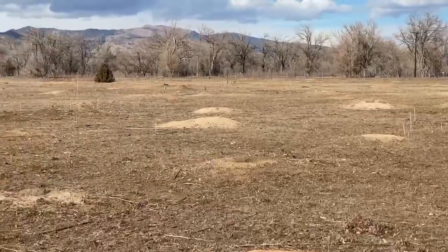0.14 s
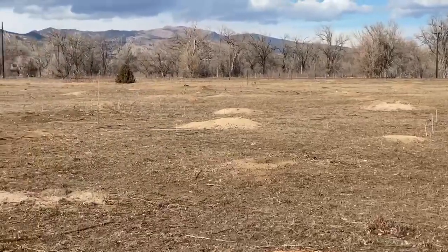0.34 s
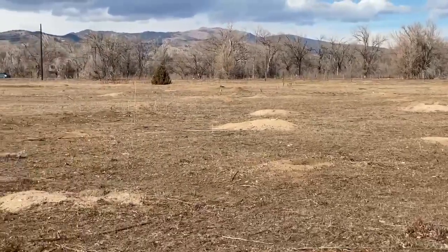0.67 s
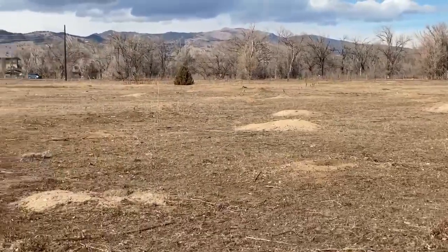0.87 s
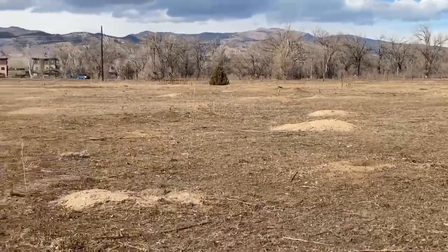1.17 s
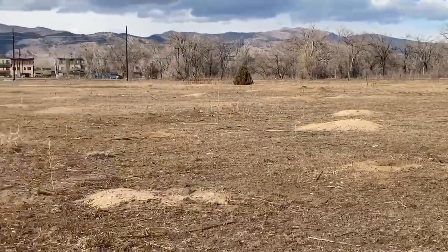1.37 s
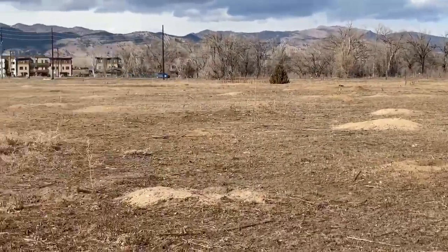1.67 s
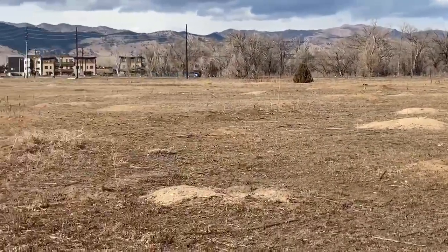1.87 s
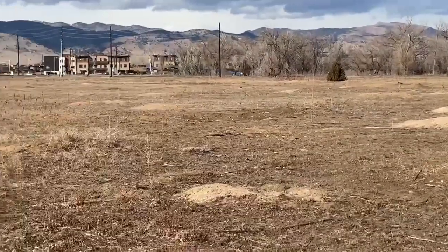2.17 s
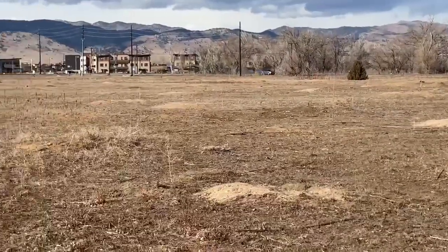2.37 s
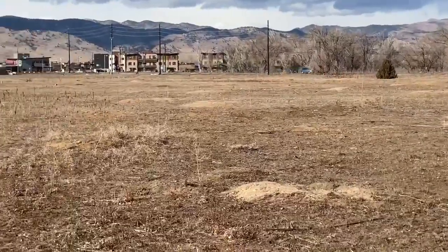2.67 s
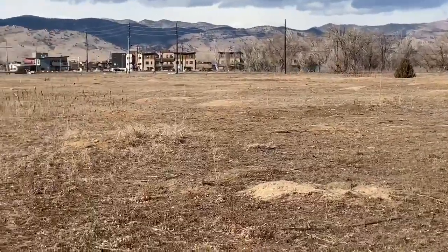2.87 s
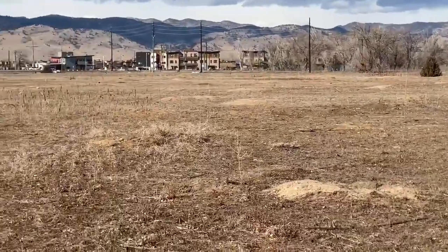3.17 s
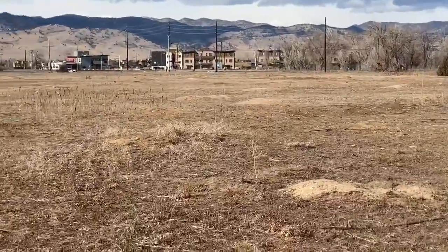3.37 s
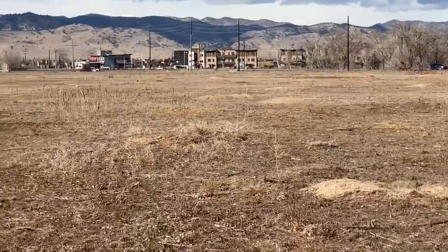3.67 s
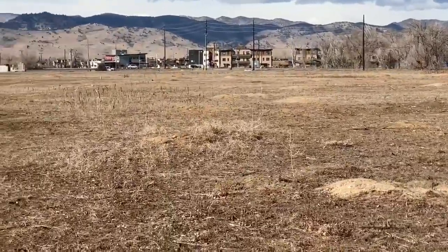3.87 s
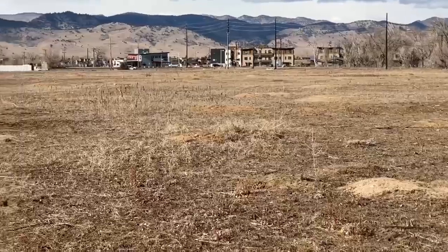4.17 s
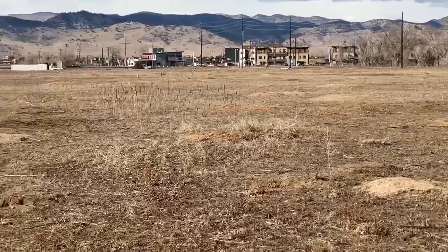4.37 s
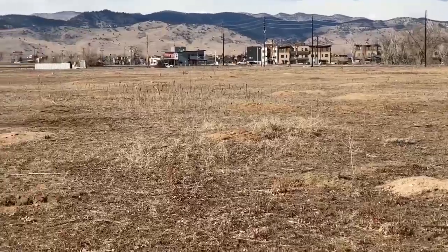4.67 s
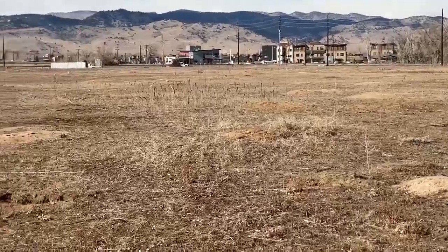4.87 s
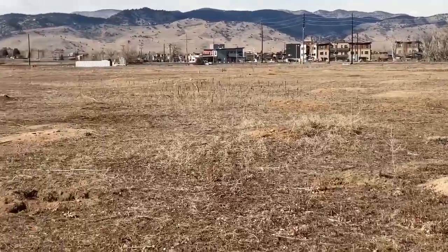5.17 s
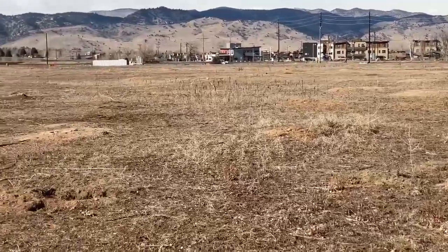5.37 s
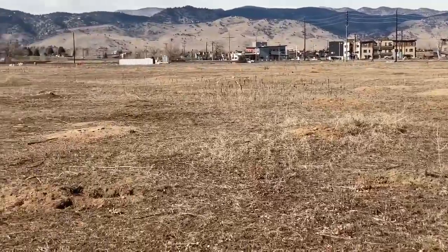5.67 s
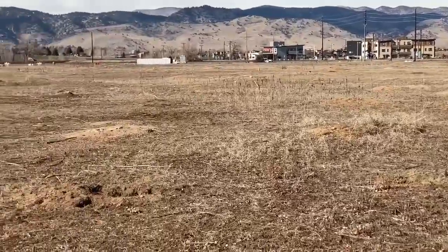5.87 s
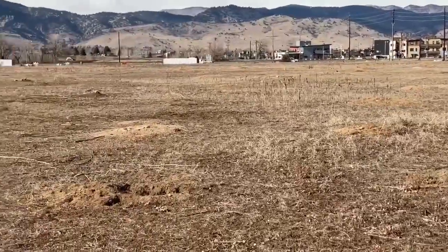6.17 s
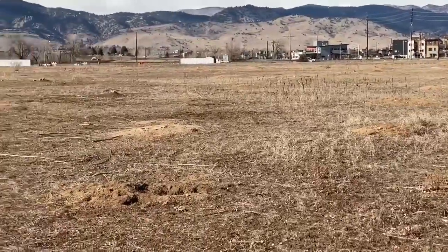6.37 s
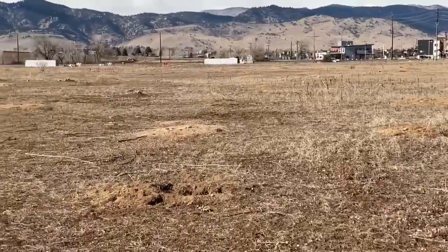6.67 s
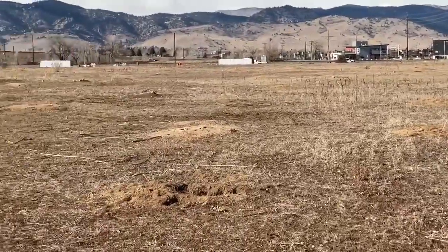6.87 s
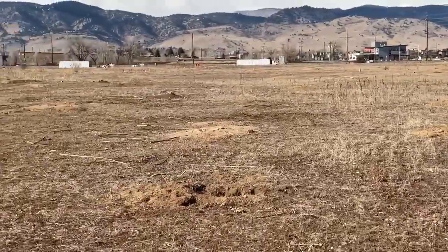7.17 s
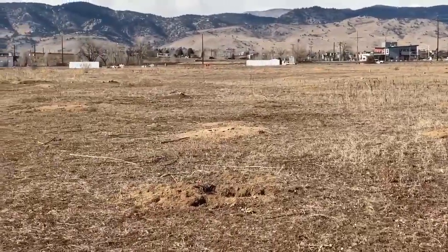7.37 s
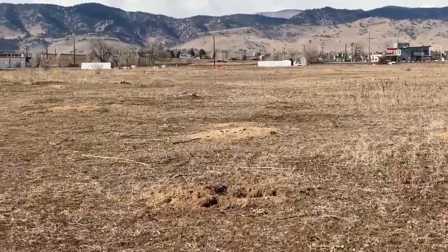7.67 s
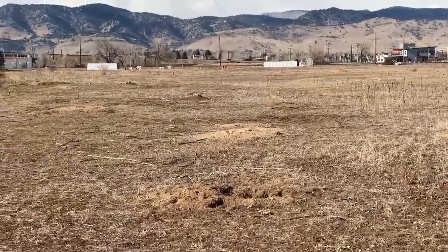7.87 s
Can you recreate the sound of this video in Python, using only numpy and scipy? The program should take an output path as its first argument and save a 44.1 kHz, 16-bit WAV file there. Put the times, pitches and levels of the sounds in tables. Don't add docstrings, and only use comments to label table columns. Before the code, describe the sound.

A single prairie dog barks a dozen times across an open dry field, each a tiny chirp cracking into a buzzy yelp, with faint echoes. Far road roar, low rumble and a wavering engine hum lie beneath. At about two and a half seconds wind thumps the microphone, then the bass thins out, leaving small muffled ticks and light hiss.

```python
import sys
import numpy as np
from scipy import signal
from scipy.fft import rfft, irfft, next_fast_len
from scipy.io import wavfile

SR = 44100
rng = np.random.default_rng(int(sys.argv[2]) if len(sys.argv) > 2 else 0)


def wav_record(signal):
    frames = np.transpose(np.atleast_2d(signal))
    bounded = np.clip(frames, -1, 1)
    quanta = np.round(bounded * 32767).astype(np.int16)
    wavfile.write(sys.argv[1], SR, quanta)


def amplitude_ratio(level_db):
    exponent = np.asarray(level_db, float) / 20
    return 10 ** exponent


N = 354123

# (time [s], echo level [dB], level of the top overtones [dB])
TURN = [
    (0.4, 5.5, -3),
    (1.7, -0.5, -4),
    (4.5, -2, 6.5),
    (7.6, -3, 3.5),
]
# (frequency [Hz], level [dB])
YELP_MOUTH = [(1000, -24.5), (1500, -11.5), (1800, -1.5), (2500, -4.5), (3200, 1), (4200, -13.5),
              (5000, -12.5), (6300, -6), (7300, -24.5), (7900, -32), (8600, -49), (9700, -28), (11000, -54),
              (12500, -60)]
LAP_S = 0.003


def rms_one(x):
    return x / np.sqrt(np.mean(np.abs(x) ** 2) + 1e-20)


def at_s(rows, s):
    times, *columns = np.transpose(rows)
    return [np.interp(s, times, c) for c in columns]


def in_time(rows):
    return at_s(rows, np.arange(N) / SR)


def at_hz(points, hz):
    point_hz, level = np.array(points).T
    return np.interp(np.log(hz), np.log(point_hz), level)


def arch(u, start, middle, end):
    return start * (1 - u) * (1 - 2 * u) + 4 * middle * u * (1 - u) + end * u * (2 * u - 1)


def edges_of(n, rise_s, fall_s):
    t = np.arange(n) / SR
    return np.sin(np.pi / 2 * np.clip(t / rise_s, 0, 1) * np.clip(t[::-1] / fall_s, 0, 1)) ** 2


def add(track, note, s):
    i = round(s * SR)
    track[i:i + len(note)] += note


def drift(rate_hz, size=N):
    step = max(1, int(SR / rate_hz / 40))
    r = np.exp(-2 * np.pi * rate_hz * step / SR)
    noise = rng.standard_normal(size // step + 102)
    slow = signal.lfilter([1], [1, -2 * r, r * r], noise)[100:]
    return np.interp(np.arange(size) / step, np.arange(len(slow)), rms_one(slow))


def banded_noise(spectrum, patchy_db, flicker_hz, apart):
    # (frequency [Hz], likeness [0-1])
    likeness = [(60, 0.9), (120, 0.72), (230, 0.56), (450, 0.37), (880, 0.15), (1730, 0.28), (3390, 0.17),
                (4700, 0.9)]
    out, together = 0, drift(flicker_hz)
    edges = 20 * 2 ** np.arange(0, 9.6, 0.5)
    size = next_fast_len(N)
    colour = amplitude_ratio(at_hz(spectrum, np.fft.rfftfreq(size, 1 / SR) + 1))
    noise = irfft(rfft(rng.standard_normal((2, 2, size))) * colour, size)[..., :N]
    for k, (low, high) in enumerate(zip(edges, edges[1:])):
        hz = np.sqrt(low * high)
        if not spectrum[0][0] * 0.7 < hz < spectrum[-1][0] * 1.2:
            continue
        band = signal.butter(2, [low, high], "band", fs=SR, output="sos")
        mid, side = signal.sosfilt(band, noise[k % 2])
        alike = np.clip(at_hz(likeness, hz) - apart, -1, 1)
        swing = np.minimum(together + 0.6 * drift(flicker_hz), 1.5)
        stereo = np.sqrt(1 + alike) * mid + np.sqrt(1 - alike) * side * [[1], [-1]]
        out = out + amplitude_ratio(patchy_db * swing) * stereo
    return rms_one(out)


def self_noise():
    # (frequency [Hz], level [dB per Hz])
    hiss_colour = [(1500, -0.5), (3000, -2), (5000, -5.5), (7200, -6.5), (8000, -12.5), (8350, -8),
                   (8650, -19.5), (9000, -10.5), (10300, -5), (11500, -15), (13000, -28)]
    return amplitude_ratio(-89) * banded_noise(hiss_colour, patchy_db=0.7, flicker_hz=9, apart=-0.059)


def road():
    # (time [s], level [dB], left-right difference [dB])
    traffic = [
        (0.0, -58.5, -2),
        (0.96, -61.5, -1.5),
        (1.9, -60.5, -2.5),
        (3.7, -60.5, 2),
        (5.0, -63, 0.5),
        (5.46, -61.5, 1),
        (7.3, -65, -1),
        (8.03, -65, 0.5),
    ]
    # (frequency [Hz], level [dB per Hz])
    road_colour = [(150, -31.5), (250, -5), (333, -3), (395, -7.5), (581, -6), (860, 0), (1070, -5),
                   (1650, -8), (1850, -12), (2150, -22.5), (2820, -39.5), (3200, -47.5), (4160, -75)]
    road_db, pan_db = in_time(traffic)
    sides = amplitude_ratio(np.array([pan_db, -pan_db]) / 2)
    roar = banded_noise(road_colour, patchy_db=1, flicker_hz=7.5, apart=-0.0038)
    return amplitude_ratio(road_db + 2) * sides * roar


def rumble():
    # (frequency [Hz], level [dB per Hz])
    rumble_colour = [(25, -40.5), (35, -21), (50, -8), (65, 3.5), (100, -3), (140, -10.5), (190, -16.5),
                     (300, -34.5), (500, -34.5)]
    return amplitude_ratio(-47) * banded_noise(rumble_colour, patchy_db=1, flicker_hz=5.3, apart=-0.14)


def engine():
    # (multiple of the base pitch, level [dB])
    hums = [
        (1, -58),
        (2, -46),
        (3, -49.5),
        (4, -58.5),
        (5, -74),
        (6, -71.5),
    ]
    phase = 2 * np.pi * np.cumsum(40.85 * (1 + 0.006 * drift(1.5))) / SR
    out = 0
    for k, db in hums:
        out = out + amplitude_ratio(db + 1 + 3.6 / k * drift(5)) * np.sin(k * phase + 7 * rng.random())
    behind = amplitude_ratio(np.interp(np.arange(N) / SR, [3.2, 4.2], [0, -8]))
    return behind * edges_of(N, 0.0025, 0.001) * out


def far_calls():
    # (time [s], length [s], start [Hz], middle [Hz], end [Hz], level [dB])
    calls = [
        (3.033, 0.016, 7500, 7500, 7440, -85.5),
        (4.714, 0.044, 3250, 3270, 3340, -86),
        (6.092, 0.049, 2980, 2900, 2940, -83),
        (6.134, .015, 4100, 4000, 4000, -88),
        (7.521, 0.069, 3410, 2860, 3500, -88),
    ]
    out = np.zeros(N)
    for s, length, start, middle, end, db in calls:
        u = np.linspace(0, 1, round(length * SR))
        tone = np.sin(2 * np.pi * np.cumsum(arch(u, start, middle, end)) / SR)
        level = amplitude_ratio(db + 3 + 3.2 * drift(200, len(u)))
        add(out, level * edges_of(len(u), 0.0091, 0.0091) * tone, s)
    return out


def wind():
    # (time [s], level [dB])
    gusts = [(2.55, -53.5), (2.85, -51), (3.1, -54.5), (3.45, -65), (3.77, -59.5), (4.15, -69), (4.3, -82),
             (4.61, -73), (5.25, -76.5), (5.5, -65.5), (5.68, -68), (6.15, -72), (6.42, -54), (6.53, -93),
             (6.7, -85), (6.8, -74), (7.12, -66.5), (7.42, -68), (8.03, -64)]
    # (frequency [Hz], level [dB per Hz])
    wind_colour = [(25, -28.5), (40, 0.5), (60, 10), (120, 4.5), (250, -14.5), (400, -34), (700, -43)]
    gusting = np.clip((np.arange(N) / SR - 2.5) / 0.056, 0, 1)
    buffets = banded_noise(wind_colour, patchy_db=6, flicker_hz=18, apart=0.04)
    return gusting * amplitude_ratio(in_time(gusts)[0] + 11.5) * buffets


def pops(count=24):
    # (time [s], peak level [dB])
    strong = [(2.58, -31.5), (2.712, -41), (2.785, -37), (2.894, -27), (3.079, -35.5), (3.448, -35.5),
              (3.518, -41), (3.562, -40.5), (3.598, -44.5), (3.703, -42), (3.807, -44.5), (3.98, -43.5),
              (4.069, -41), (4.094, -47.5), (4.156, -46.5), (4.446, -43.5), (4.507, -49), (4.631, -48),
              (4.847, -52), (5.289, -50), (5.371, -46.5), (5.428, -49), (5.919, -49.5), (6.034, -49.5),
              (6.495, -47), (7.021, -50.5), (7.257, -48), (7.298, -44.5), (7.486, -49.5), (7.862, -39)]
    # (time [s], pitch [Hz])
    pop_pitch = [(3.45, 123), (3.6, 215), (3.98, 226), (4.08, 387), (4.85, 247), (5.35, 330), (6.5, 272),
                 (7.3, 180), (7.9, 136.5)]
    out = np.zeros(N + SR)
    small_s = 3 + 4.9 * rng.random(count)
    small_db = -56 + 10.5 * rng.uniform(-1, 1, count)
    for s, db in [*strong, *zip(small_s, small_db)]:
        hz = at_s(pop_pitch, s)[0] * rng.uniform(0.88, 1.12)
        t = np.arange(round(4 / hz * SR)) / SR
        thump = np.sin(2 * np.pi * hz * t) * (t * hz) * np.exp(-2.2 * t * hz)
        add(out, amplitude_ratio(db) * thump / np.abs(thump).max(), s)
    return out[:N]


def bass_left(t):
    # (time [s], length [s], deep bass [dB], upper bass [dB])
    leaks = [(3.296, 0.034, -46.5, -43), (3.402, 0.13, -50, -41), (3.56, .05, -72, -56),
             (3.66, .18, -91, -61.5), (3.998, 0.018, -93, -65.5), (4.097, .02, -88, -100),
             (4.391, 0.011, -69, -70), (4.454, 0.15, -92, -77.5), (4.805, 0.029, -89, -81),
             (4.904, .1, -105, -80), (5.06, 0.055, -72, -70), (5.17, 0.13, -72, -67),
             (5.347, 0.26, -109, -78), (5.69, 0.27, -110, -83), (6.055, .17, -89, -82),
             (6.298, 0.076, -100, -78), (6.45, 0.018, -60.5, -63), (6.73, .06, -92, -104),
             (6.919, 0.019, -58.5, -77), (7.013, 0.34, -97, -65.5), (7.268, .02, -85, -54),
             (7.476, 0.025, -76, -59.5), (7.671, 0.048, -46.5, -51), (7.762, 0.026, -68, -46),
             (7.86, 0.0085, -65, -49), (7.965, 0.04, -94, -72)]
    s, length, deep_db, upper_db = np.transpose(leaks)[:, :, None]
    away_s = np.maximum(np.maximum(s - t, t - s - length), 0)
    deep = np.maximum((deep_db - 595 * away_s).max(axis=0), -110)
    upper = np.maximum((upper_db - 402 * away_s).max(axis=0), -108)
    return np.array([deep, upper]) * (t > leaks[0][0])


def wind_filter(x):
    hz, t, frames = signal.stft(x, SR, nperseg=2048, noverlap=1536)
    deep_db, upper_db = bass_left(t)
    deep_cut = np.clip(-44 - deep_db, 0, 80)
    upper_cut = np.clip(-50 - upper_db, 0, 60)
    deep_share = at_hz([(25, 2.2), (60, 1.01), (100, 0.92), (135, 0)], hz + 1)[:, None]
    upper_share = at_hz([(100, 0.071), (135, 0.88), (145, 0.78), (185, 0.31), (230, 0.016)], hz + 1)[:, None]
    gain = amplitude_ratio(-deep_cut * deep_share - upper_cut * upper_share)
    return signal.istft(frames * gain, SR, nperseg=2048, noverlap=1536)[1][:, :N]


def voice(pitch, mouth, rough, jitter, buzz, odd_db, top_db, scatter, count=7):
    n = len(pitch)
    phase = 2 * np.pi * np.cumsum(pitch * (1 + jitter * drift(600, n))) / SR
    throb = buzz * np.exp(2j * np.pi * (310 * np.arange(n) / SR + rng.random()))
    out = 0
    for k in range(1, count + 1):
        ragged = drift(650, n) + 1j * drift(650, n)
        lag = scatter * rng.normal()
        smear = np.clip(rough * (k / 2) ** 0.8, 0, 0.8)
        line = (1 - smear + smear * ragged) * (1 + throb * min(2 / k, 1))
        out = out + amplitude_ratio(odd_db * (k % 2)) * line * np.exp(1j * (k * phase + lag))
    breath = 0.31 * rng.standard_normal(n)
    source = (out.real + breath) * edges_of(n, 0.00049, 0.001)
    hz = np.fft.rfftfreq(2 * n, 1 / SR) + 1
    colour = amplitude_ratio(at_hz(mouth, hz) + top_db * np.clip((hz - 7500) / 800, 0, 1))
    return rms_one(irfft(rfft(source, 2 * n) * colour)[:n])


def chirp(length, hz, db, climb, crack_hz, hoarse, top_db):
    # (frequency [Hz], level [dB])
    chirp_mouth = [(1000, -28), (1500, -6.5), (1900, 1.5), (3400, 0), (5300, -7), (7200, -10), (7900, -39),
                   (8600, -32.5), (9500, -32.5), (11000, -39), (12500, -61)]
    u = np.linspace(0, 1, round((length + LAP_S) * SR))
    pitch = arch(u ** 0.9, hz * (1 - climb), hz, crack_hz)
    note = voice(pitch, chirp_mouth, 0.03 + hoarse * 1.5 * u ** 3, jitter=0.0048, buzz=0.14,
                 odd_db=0, top_db=top_db, scatter=0.56)
    return amplitude_ratio(db + 3) * edges_of(len(u), 0.0047, 0.0038) * note


def rasp(length, start_hz, end_hz, start_db, end_db, hoarse, top_db):
    u = np.linspace(0, 1, round((length + LAP_S) * SR))
    note = voice(start_hz + (end_hz - start_hz) * u, YELP_MOUTH, 0.12 + hoarse, jitter=0.007, buzz=0.3,
                 odd_db=2, top_db=top_db, scatter=2)
    return amplitude_ratio(1 + start_db + (end_db - start_db) * u) * edges_of(len(u), 0.0075, 0.0016) * note


def yelp(length, hz, db, scoop, hoarse, top_db):
    u = np.linspace(0, 1, round((length + 2 * LAP_S) * SR))
    rising = np.clip(1 - u / 0.5, 0, 1)
    falling = np.clip(1 - (1 - u) * max(length / 0.019, 2), 0, 1)
    pitch = hz * (1 - scoop * rising ** 2 - 0.1 * falling ** 2)
    note = voice(pitch, YELP_MOUTH, hoarse * (1.3 - 0.5 * u), jitter=0.0032, buzz=min(3.8 * hoarse, 0.36),
                 odd_db=3 - 32.5 * hoarse, top_db=top_db, scatter=2.5)
    swell = amplitude_ratio(db + arch(u, -1.5 - 38 * scoop, 2.3, -7.5))
    return swell * edges_of(len(u), 0.0024, 0.0067) * note


def barks():
    # (time [s], length [s], middle pitch [Hz], level [dB], climb into it [share of pitch])
    chirps = [(0.411, 0.013, 1717, -69.5, 0.11), (1.513, 0.022, 1963, -60, 0.23),
              (1.874, 0.015, 1817, -57.5, 0.1), (2.578, 0.013, 1848, -58.5, .1),
              (3.288, 0.014, 1816, -57.5, 0.17), (3.974, 0.016, 1770, -61, 0.14),
              (4.739, 0.021, 1678, -61.5, 0.087), (5.56, 0.014, 1770, -56, .06),
              (6.262, 0.011, 1600, -63, .1), (6.685, 0.019, 1810, -54.5, 0.071),
              (7.096, 0.018, 1690, -62, 0.055), (7.624, 0.01, 1651, -61, 0.051)]
    # (time [s], length [s], middle pitch [Hz], level [dB], scoop up into it [share of pitch])
    yelps = [(0.431, 0.033, 1503, -76.5, 0.16), (1.542, 0.077, 1702, -57.5, -0.084),
             (1.905, 0.044, 1646, -57.5, -.04), (2.604, 0.039, 1600, -61, .03),
             (3.318, 0.035, 1622, -59.5, .1), (4.001, 0.031, 1578, -62, .13),
             (4.766, 0.031, 1609, -58.5, .03), (5.59, 0.033, 1594, -59.5, .135),
             (6.289, 0.025, 1546, -60.5, .13), (6.711, 0.029, 1623, -56.5, 0.19),
             (7.128, 0.026, 1545, -60, .065), (7.651, 0.025, 1532, -63, 0.076)]
    # (time [s], hoarseness [0-1])
    hoarseness = [
        (.4, .03),
        (1.5, .24),
        (3.6, .16),
        (5.0, .08),
        (6.3, .07),
        (7.7, .13),
    ]
    out = np.zeros(N)
    for chirp_row, yelp_row in zip(chirps, yelps):
        s, length, chirp_hz, chirp_db, climb = chirp_row
        yelp_s, yelp_length, yelp_hz, yelp_db, scoop = yelp_row
        hoarse = at_s(hoarseness, s)[0]
        top_db = at_s(TURN, s)[1] + 0.34 * (chirp_db + 61)
        broken = max(scoop - 0.071, 0)
        hush_db = 335 * broken
        crack_hz = chirp_hz * (1 - max(0.14 - climb, 0) - 1.2 * broken)
        add(out, chirp(length, chirp_hz, chirp_db, climb, crack_hz, hoarse, top_db), s - LAP_S / 2)
        reach_s = 0.004
        rasp_s = s + length - reach_s
        crack = rasp(yelp_s + reach_s - rasp_s, crack_hz, yelp_hz * (1 - scoop),
                     chirp_db - 0.29 * hush_db, yelp_db - hush_db, hoarse, top_db)
        add(out, crack, rasp_s - LAP_S / 2)
        add(out, yelp(yelp_length, yelp_hz, yelp_db, scoop, hoarse, top_db), yelp_s - LAP_S / 2)
    return out


def field(x):
    # (delay [s], spread [s], level [dB])
    echoes = [
        (.004, .004, -14),
        (.022, 0.018, -29),
        (0.08, 0.027, -33),
        (.148, 0.012, -30.5),
        (.19, .025, -39.5),
        (.26, .012, -39),
    ]
    t = np.arange(round(0.4 * SR)) / SR
    shapes = []
    for delay, spread, db in echoes:
        cluster = np.exp(-0.5 * ((t - delay) / spread) ** 2)
        shapes.append(amplitude_ratio(db) * cluster / np.sqrt(spread * SR))
    common, own = rng.standard_normal(len(t)), rng.standard_normal((2, len(t)))
    ground = sum(shapes[:2]) * (common[::-1] + 1.12 * own[::-1])
    near = signal.fftconvolve(x[None], ground, axes=1)
    band = signal.butter(2, [2700, 4000], "band", fs=SR, output="sos")
    walls = signal.sosfilt(band, sum(shapes[2:]) * (common + 0.55 * own))
    facing = amplitude_ratio(in_time(TURN)[0]) * (1 + 0.7 * drift(160))
    far = signal.fftconvolve(facing * x[None], walls, axes=1)
    return (near + far)[:, :N]


def ports(bark):
    band = signal.butter(3, (7600, 9500), "band", fs=SR, output="sos")
    treble = signal.sosfilt(band, bark + amplitude_ratio(-89.5) * rng.standard_normal(N))
    return treble * [[1], [-1]]


def scene():
    to_right = amplitude_ratio([[-0.6], [0.6]])
    low = road() + (rumble() + engine()) * to_right + wind() + pops()
    bark = barks()
    return wind_filter(low) + self_noise() + bark + far_calls() + field(bark) + ports(bark)


def low_pass(x):
    return signal.sosfilt(signal.butter(12, 11700, fs=SR, output="sos"), x)


def record(dry):
    return low_pass(dry)


dry = scene()
out = record(dry)
wav_record(out)
```